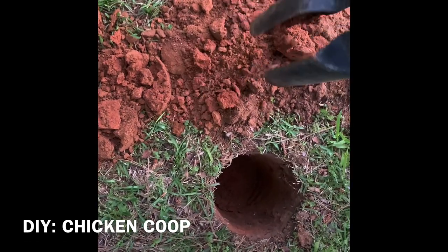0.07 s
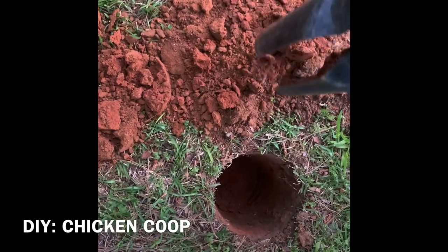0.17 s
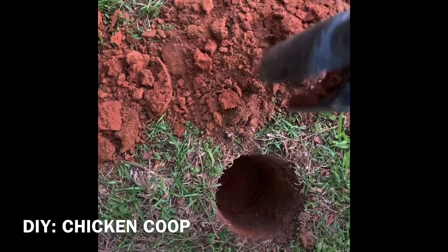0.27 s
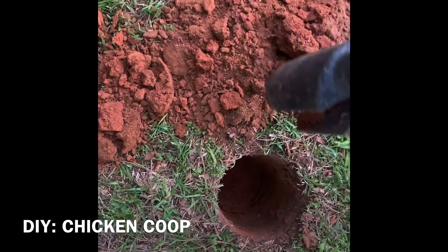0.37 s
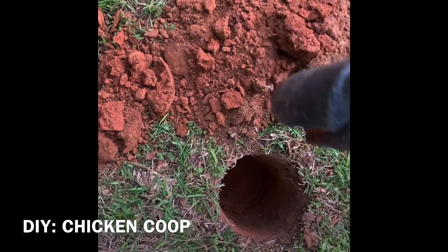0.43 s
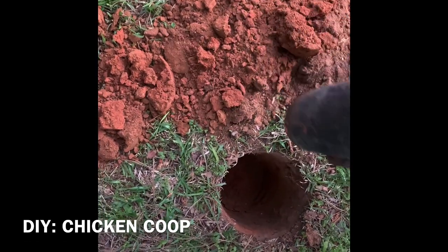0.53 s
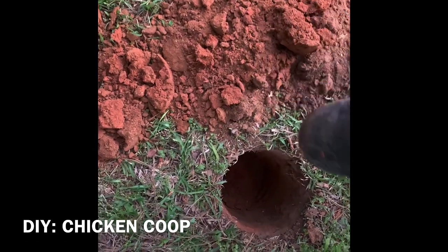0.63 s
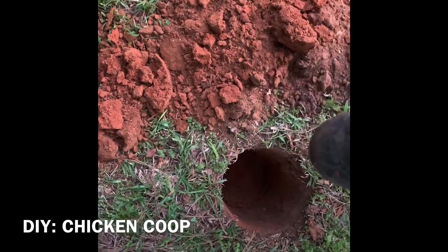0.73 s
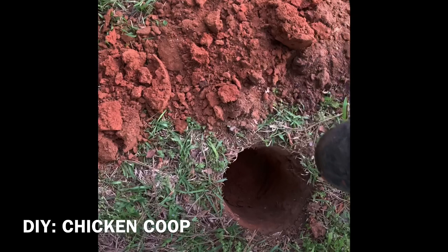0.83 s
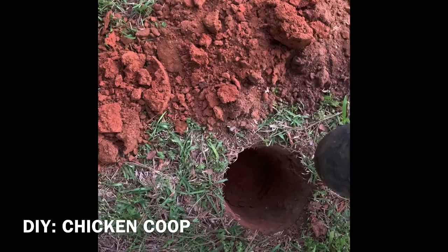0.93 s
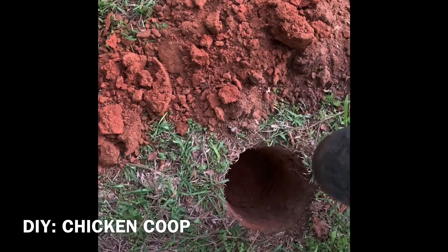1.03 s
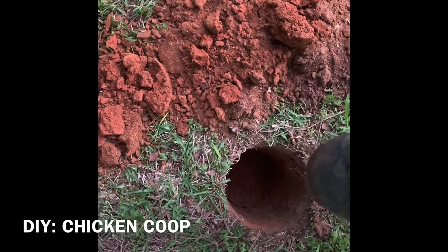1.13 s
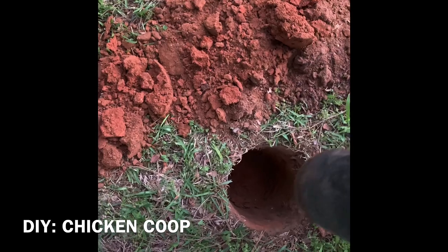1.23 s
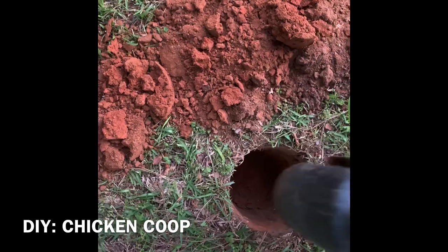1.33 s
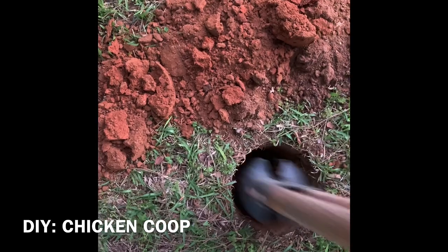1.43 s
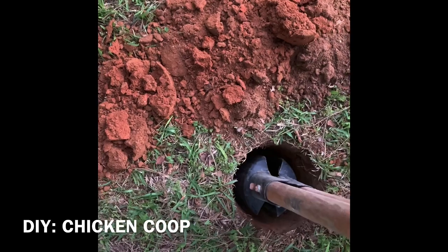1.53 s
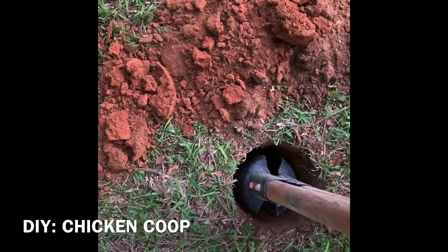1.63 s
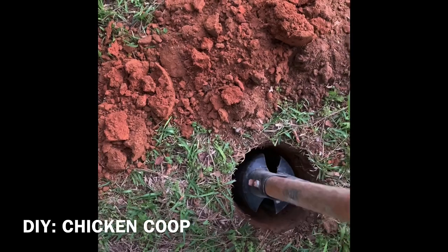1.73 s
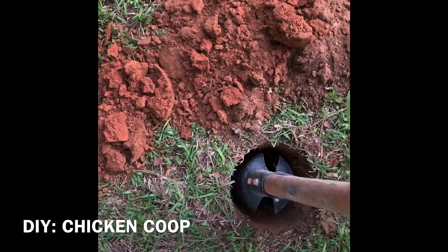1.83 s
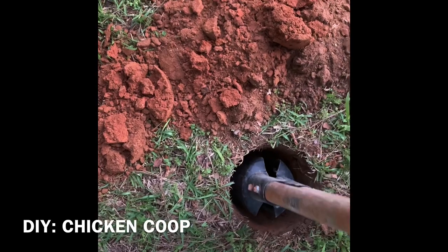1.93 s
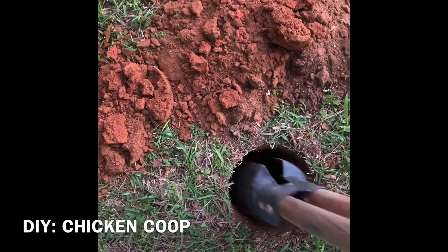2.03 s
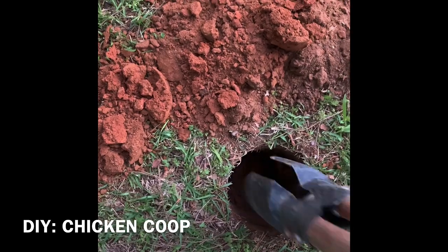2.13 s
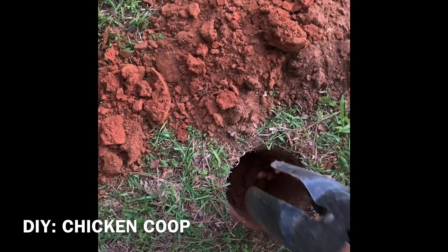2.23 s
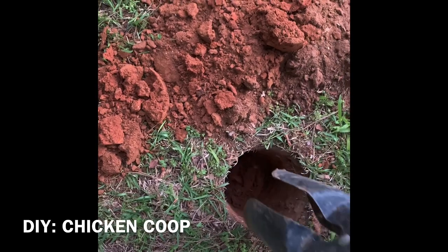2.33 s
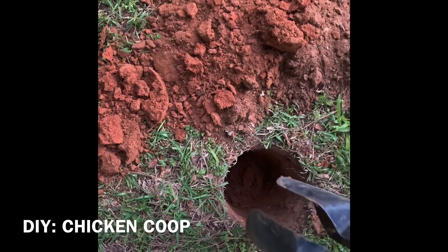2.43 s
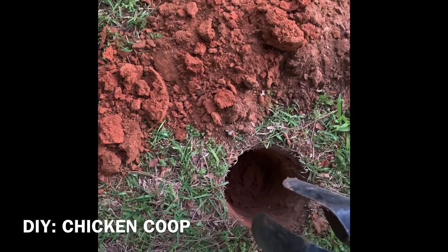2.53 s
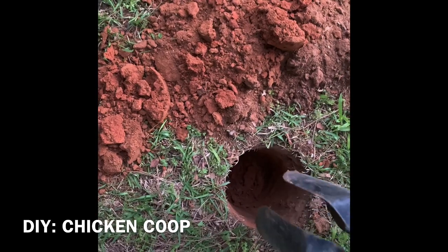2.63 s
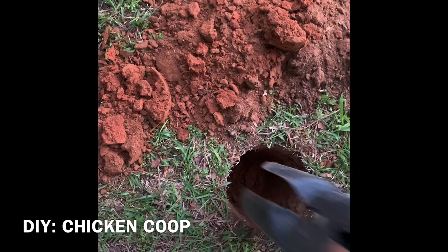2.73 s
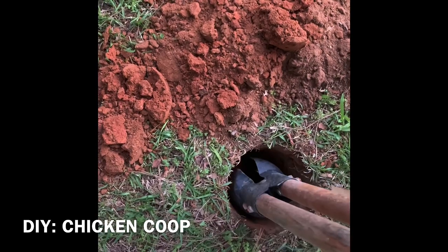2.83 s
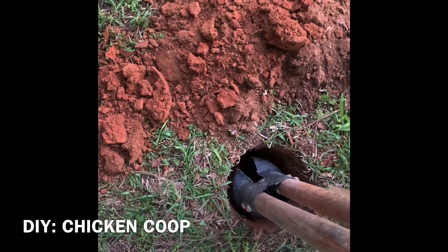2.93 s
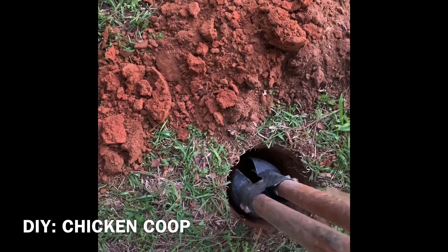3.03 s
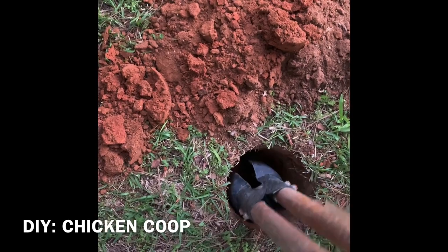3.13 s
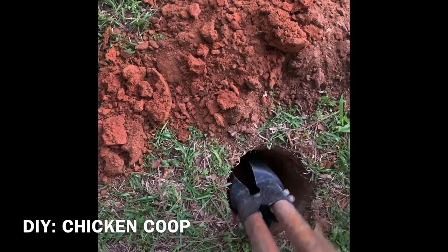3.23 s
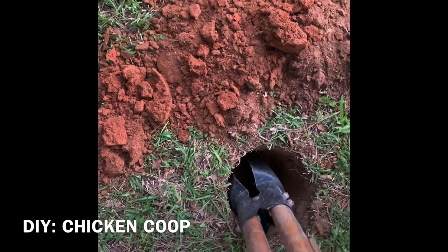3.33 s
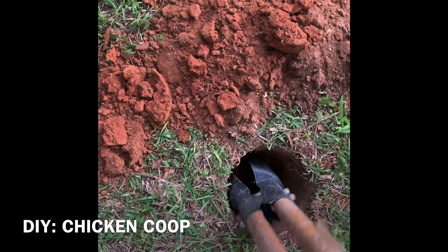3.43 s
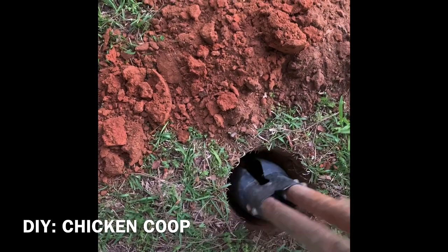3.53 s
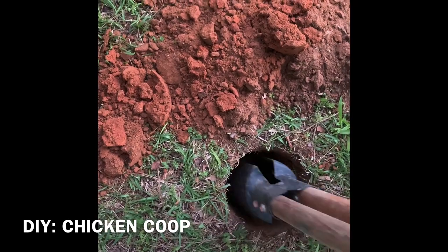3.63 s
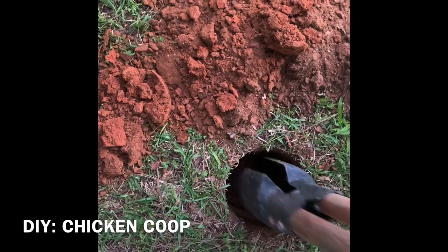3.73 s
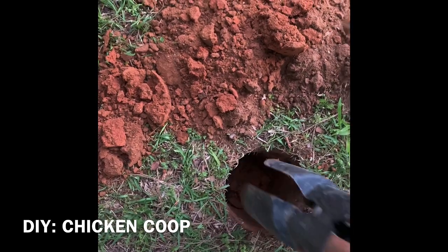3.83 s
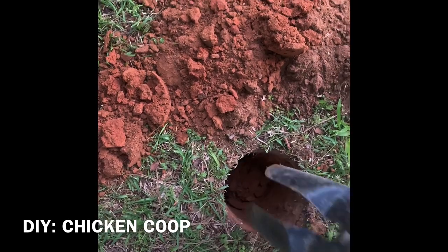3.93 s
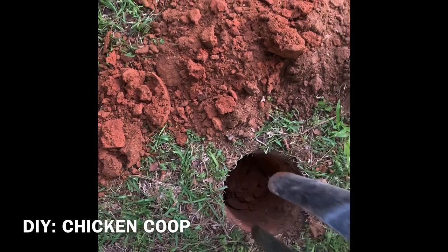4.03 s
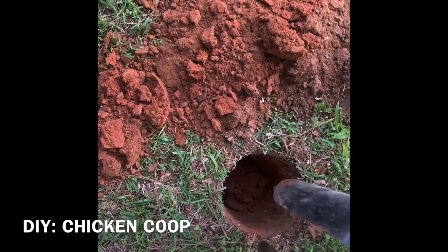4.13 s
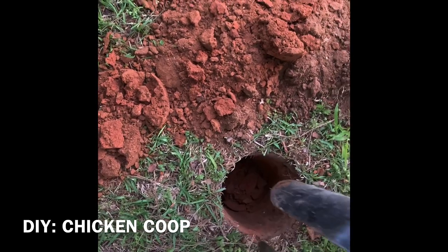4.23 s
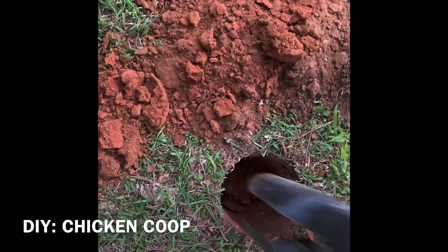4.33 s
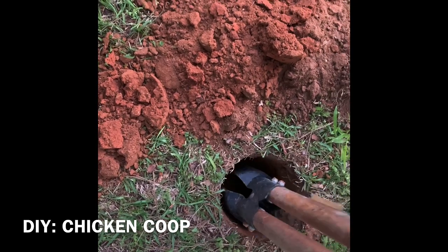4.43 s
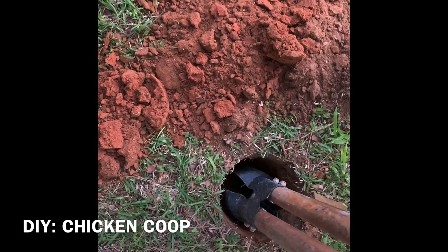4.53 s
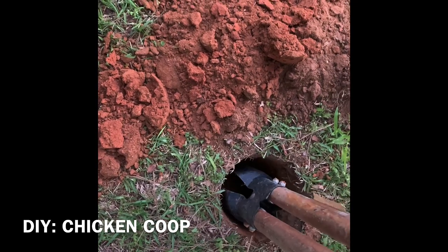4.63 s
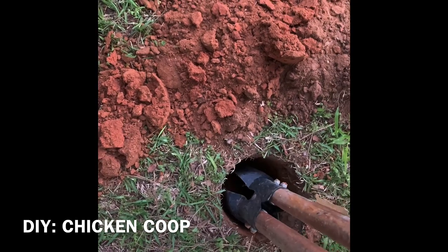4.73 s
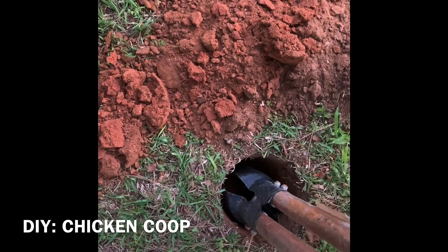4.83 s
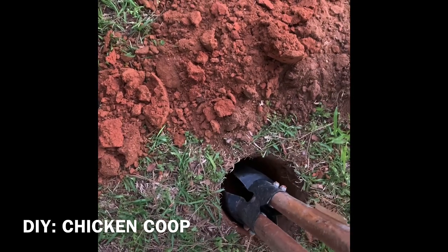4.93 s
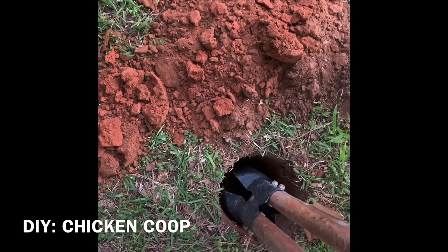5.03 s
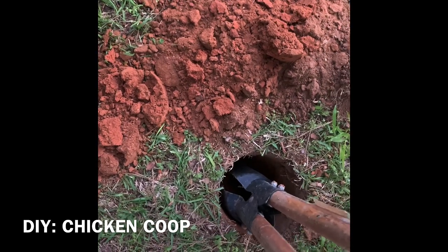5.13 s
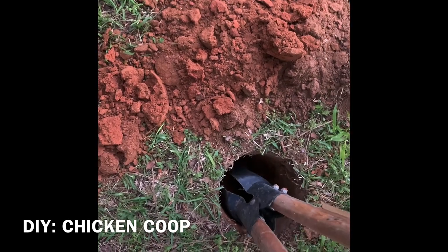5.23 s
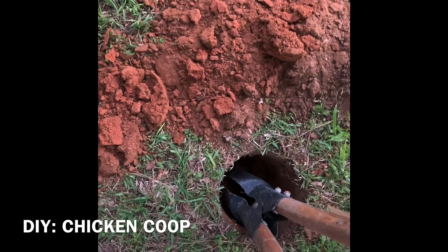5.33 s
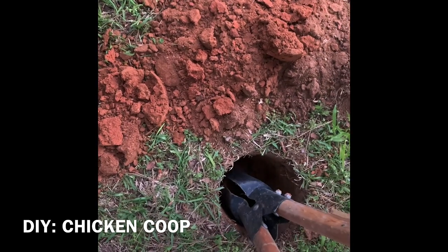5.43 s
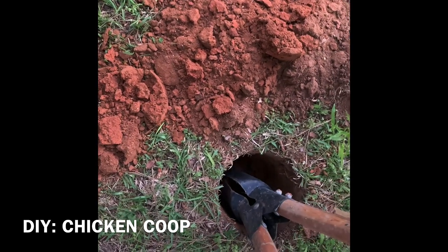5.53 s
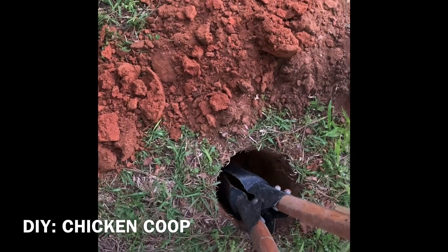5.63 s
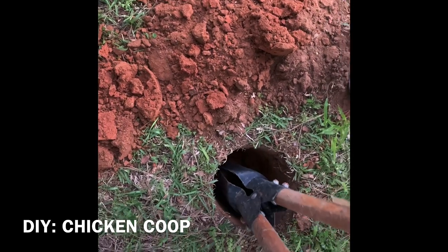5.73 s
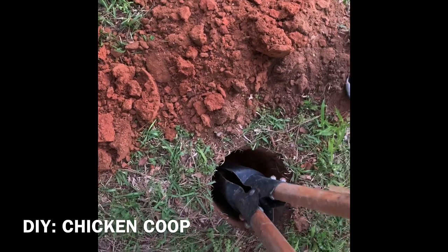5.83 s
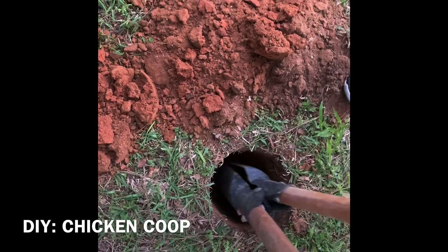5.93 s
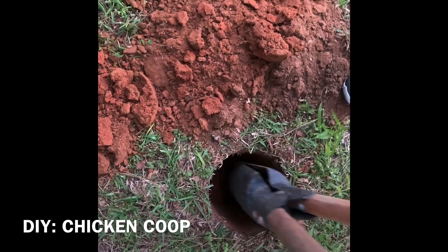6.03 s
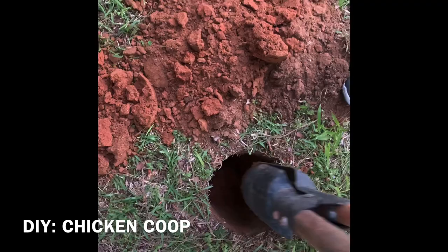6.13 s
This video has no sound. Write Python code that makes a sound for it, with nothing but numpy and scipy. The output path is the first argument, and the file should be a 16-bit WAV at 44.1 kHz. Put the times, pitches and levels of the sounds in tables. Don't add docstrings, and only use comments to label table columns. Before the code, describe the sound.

Light wind and distant low rumble lie under a hole being dug in hard clay. The scoop is tapped out, then driven down twice, each blow a tight knock of wood and buried steel with splitting grit and a falling bassy thump. Blades scrape loose with a small ringing clash; another big stab follows, then soft sliding crumbs and ticks. Close stereo phone pickup, dry open air.

```python
import sys
import numpy as np
from scipy import signal
from scipy.fft import rfft, irfft, next_fast_len
from scipy.io import wavfile
from scipy.ndimage import uniform_filter1d

SR = 44100
rng = np.random.default_rng(int(sys.argv[2]) if len(sys.argv) > 2 else 0)


def gain_from_decibels(decibels):
    exponent = np.asarray(decibels, float) / 20
    return 10 ** exponent


def to_wav(s):
    ch = np.atleast_2d(s).T
    pcm = np.round(np.clip(ch, -1, 1) * 32767)
    wavfile.write(sys.argv[1], SR, pcm.astype(np.int16))


N = 272965
T = np.arange(N) / SR
LONG = next_fast_len(N)
HZ = np.maximum(np.arange(LONG // 2 + 1) * SR / LONG, 1)

# f/Hz, density/dB per Hz
AIR_SPECTRUM = [(120, -7.5), (430, -11), (900, -11.5), (1500, -16), (2100, -23.5), (2800, -32.5),
                (4500, -38), (7500, -49), (11000, -44.5), (14000, -50.5)]
RUMBLE_SPECTRUM = [(12, -47.5), (20, -7.5), (33, -2), (54, 3), (135, -7.5), (166, -16.5), (220, -18),
                   (290, -46), (480, -120)]
DUST_SPECTRUM = [(8000, -12), (10000, 0.5), (12000, 2), (14000, 0.5), (16000, -3.5)]
CRUMB_SPECTRUM = [(3500, -2), (5000, 0.5), (6500, -0.5), (8000, -3), (9500, -5)]
CLAY_SPECTRUM = [(300, -7.5), (700, 5), (1200, -1.5), (1700, 3), (2400, -2), (3300, -4.5), (4300, -4.5)]
LUMP_SPECTRUM = [(200, -3), (400, -3.5), (700, -1.5), (1100, -6.5)]
GRIT_SPECTRUM = [(3000, -7), (4200, -9), (5500, 2.5), (6800, 2), (8800, 0.5), (10500, -2.5), (12700, -0.5),
                 (15500, -6)]
# f/Hz, correlation
PORT_LIKENESS = [(60, 0.96), (130, 1), (290, 0.7), (640, -0.18), (1400, -0.15), (3100, -0.5), (16000, 1)]
# t/s, level/dB
GUSTS = [(0.0, -53.5), (1.3, -56), (1.78, -52.5), (2.41, -53), (2.65, -56), (2.89, -50), (3.1, -53.5),
         (3.98, -55.5), (4.79, -50.5), (5.0, -51.5), (5.3, -56), (6.19, -53.5)]
# t/s, flow level/dB, coarse share level/dB
TRICKLE = [(0.0, -96, 16), (0.12, -81, 16), (0.65, -69.5, 8), (0.9, -76, 7.5), (1.17, -87, 2),
           (1.96, -68.5, 16.5), (2.29, -81.5, 7), (2.76, -84.5, 7.5), (2.98, -65.5, 8), (3.62, -61, 8.5),
           (3.78, -69, 13.5), (4.07, -84, 4), (4.34, -70.5, 8), (4.53, -64, 8), (4.93, -68.5, 12),
           (5.55, -70, 12.5), (5.9, -75, 9.5), (6.19, -70, 15)]
# t/s, level/dB, size (0 dust, 1 crumb, 2 clay, 3 lump)
GRAINS = [(0.841, -62, .1), (.8574, -54, 0.37), (0.8897, -48, 0.081), (.903, -47, 0.15), (.9194, -56, 0.28),
          (.9562, -55, 0.28), (0.981, -52, .05), (0.9953, -67, 0.91), (1.034, -59, 0.56),
          (1.0835, -54.5, 1.03), (1.8789, -52, 1.27), (3.1957, -54, 0.11), (3.4161, -52, 0.81),
          (3.492, -38, 0.72), (3.5769, -41, 1.26), (3.586, -34.5, .45), (4.4763, -48, 0.63),
          (5.116, -49, 0.43), (5.5949, -37.5, .21), (5.608, -53, 0.56), (5.6486, -40.5, 0.6),
          (5.656, -45.5, 0.86), (5.851, -56, 0.068), (5.983, -42.5, 0.97), (6.008, -52, 1.23),
          (6.062, -52, 0.63), (6.0851, -54, 0.87), (5.247, -50.5, 1.6), (4.967, -54.5, .9),
          (4.703, -53, .9), (5.143, -55, 0.92)]
# t/s, level/dB, size (as above), ring f/Hz
CLODS = [(.5564, -56, 2.3, 1573), (.7024, -54, 1.1, 1890), (1.6961, -47.5, 2.83, 343),
         (1.9614, -44, 1.22, 1740), (2.0914, -39, 1.84, 770), (2.1594, -47, 2.26, 2046),
         (2.3327, -50.5, 2.95, 794), (2.7157, -52.5, 1.98, 784), (2.9533, -43.5, 0.99, 3350),
         (3.198, -49, 3, 580), (3.3394, -35, 0.91, 1920), (4.347, -42, 1.65, 813),
         (4.4766, -36.5, 4.04, 700), (4.729, -50.5, 1.9, 1550), (4.637, -51.5, 2.6, 580),
         (4.777, -44, 1.38, 940), (4.9494, -51, 1.58, 1550)]
# f/Hz, level/dB, t60/s
SCOOP_MODES = [(1550, -33.5, 0.06), (2154, -37, 0.085), (3680, -48, 0.084)]
# lag/s, level/dB, f/Hz, t60/s
TAP_MODES = [(-.014, -33, 1300, .05), (-.007, -27, 1300, 0.12), (.0003, 5.5, 1384, 0.0061),
             (.0004, -10.5, 1900, 0.018), (-0.017, -25.5, 167, 0.026), (.012, -25.5, 813, 0.041),
             (.0031, -7, 1030, 0.011), (-0.0028, -7, 366, 0.018), (0.00016, -14, 1318, .04),
             (.0075, -14.5, 1680, 0.031), (-0.002, -36.5, 2900, 0.025), (.006, -36.5, 510, .049)]
# f/Hz, level/dB, t60/s
CLASH_MODES = [(2400, -30, .075), (2020, -32, .07), (4030, -31, .13), (5980, -33, .15), (780, -35, .05)]
# t/s, level/dB, f/Hz, t60/s
KNOCKS = [(1.453, -20, 934, 0.048), (1.455, -3, 269, 0.023), (1.46, -3.5, 3020, .012),
          (1.464, -14, 2408, 0.013), (1.4641, -6, 972, 0.049), (1.4645, -6.5, 648.5, 0.059),
          (1.467, -6, 304, 0.036), (1.464, -17.5, 1670, 0.044), (1.4707, -9.5, 803, 0.028),
          (1.4788, -19, 149.3, 0.025), (2.8, -19, 1375, 0.06), (2.801, -19, 3780, 0.048),
          (2.806, -21.5, 810, 0.052), (2.812, -7.5, 369, 0.041), (2.815, -8.5, 328, 0.032),
          (2.8217, -5, 302, 0.046), (2.831, 0, 148.7, .022), (3.70, -28.5, 284, 0.064),
          (4.411, -10, 834, 0.047), (4.4204, 0.5, 695, 0.016), (4.4231, 4, 287, 0.023),
          (4.424, -12, 1453, 0.036), (4.4297, 0, 199.9, 0.07), (4.4319, 0.5, 196.8, 0.06),
          (4.436, -20, 138, .03)]
# t/s, left minus right level/dB
STAB_LEANS = [
    (1.46, -5.5),
    (2.81, -9.5),
    (3.7, -2),
    (4.42, 8.5),
]
# t/s, level/dB, first f/Hz, last f/Hz, t60/s
THUMPS = [
    (1.48, -12, 132.5, 72.4, 0.058),
    (2.8297, -9, 125, 61.6, .1),
    (4.4334, -6, 124, 58.7, 0.098),
    (4.924, -27.5, 71.4, 59, 0.1),
    (5.049, -30.5, 59, 48, 0.38),
    (2.156, -39.5, 101.5, 91, 0.4),
]
# t/s, hold/s, treble level/dB, middle level/dB
BITES = [
    (1.441, 0.0028, -56, -38),
    (2.801, 0.011, -20.5, -23),
    (3.68, 0.0076, -42, -43),
    (4.405, 0.014, -25.5, -28.5),
]
# t/s, hold/s, treble level/dB, middle level/dB
CRACKS = [
    (1.45, 0.013, -24.5, -25),
    (1.4628, .004, -18.5, -14),
    (2.807, 0.015, -32, -27),
    (3.69, 0.0108, -26, -42.5),
    (3.703, 0.0043, -27.5, -47),
    (4.418, 0.0073, -32, -28.5),
    (2.828, .0012, -34.5, -31),
]
# t/s, hold/s, treble level/dB, middle level/dB
SETTLES = [
    (.672, 0.0028, -57.5, -40),
    (1.466, 0.0027, -42.5, -30),
    (2.828, 0.002, -43, -30.5),
    (3.709, 0.011, -44.5, -40),
    (4.43, 0.0053, -43.5, -32.5),
]
# t/s, hold/s, treble level/dB, middle level/dB
RUBS = [(0.872, 0.17, -64.5, -87), (1.506, 0.11, -64.5, -62), (1.794, 0.027, -77, -53),
        (1.98, 0.026, -45, -46), (2.968, 0.19, -66, -65), (3.209, 0.046, -52, -50.5),
        (3.598, 0.055, -53.5, -61), (4.557, 0.15, -56.5, -67), (5.133, 0.13, -60.5, -57),
        (5.63, 0.12, -64, -63), (5.958, .05, -58.5, -56)]
# f/Hz, level/dB, t60/s
BLADE_MODES = [(1540, -8, .07), (2020, -3, .08), (2400, -7, .05), (2680, -8, .08), (4030, -5, .11),
               (4850, -10, .09), (5830, -8, .05), (5980, -12, .13), (6550, -6, .05)]
# f/Hz, level/dB, t60/s
HINGE_MODES = [(12700, -55, .22), (12560, -58, .18)]


def along(table):
    hz, value = np.transpose(table)
    return np.interp(np.log(HZ), np.log(hz), value)


def noise(spectrum):
    skirt = np.minimum(HZ / spectrum[0][0], 1) ** 3 * np.minimum(spectrum[-1][0] / HZ, 1) ** 4
    mid, side = rfft(rng.standard_normal((2, LONG)))
    like = np.clip(along(PORT_LIKENESS), -1, 1)
    mid, side = mid * np.sqrt(1 + like), side * np.sqrt(1 - like)
    ports = np.array([mid + side, mid - side])
    x = irfft(ports * gain_from_decibels(along(spectrum)) * skirt, LONG)[:, :N]
    return x / x.std()


def walk(rate):
    hold = int(SR / rate)
    steps = np.repeat(rng.standard_normal(N // hold + 1), hold)
    return uniform_filter1d(uniform_filter1d(steps, hold), hold)[:N]


def patchy(x, depth_db, frames=5, bins=14):
    z = signal.stft(x, nperseg=256)[2]
    field = rng.standard_normal(z.shape[1:])
    field = uniform_filter1d(uniform_filter1d(field, frames, axis=1), bins, axis=0)
    gain = gain_from_decibels(depth_db * np.clip(field / field.std(), -3, 1.7))
    return signal.istft(z * gain, nperseg=256)[1][:, :N]


def add(out, s, sound):
    i = int(s * SR)
    out[..., i:i + sound.shape[-1]] += sound[..., :N - i]


def swell(rise_s, t60_s, hold_s=0):
    t = np.arange(int((6 * rise_s + hold_s + 1.3 * t60_s) * SR)) / SR - 6 * rise_s
    rise = np.exp(np.minimum(t, 0) / rise_s)
    return np.where(t < 0, rise, gain_from_decibels(-60 * np.maximum(t - hold_s, 0) / t60_s))


def ring(hz, t60_s, pan_db, phase_rad, rise_cycles):
    t = np.arange(int(t60_s * SR)) / SR
    sides = np.array([[1], [-1]])
    push = np.sin(np.pi / 2 * np.minimum(t * hz / rise_cycles, 1)) ** 2
    decay = gain_from_decibels(-60 * t / t60_s + sides * pan_db / 2)
    return push * decay * np.sin(2 * np.pi * hz * t + sides * phase_rad)


def mode(push, hz, db, t60_s):
    pole = np.exp(2j * np.pi * hz / SR - np.log(1000) / (t60_s * SR))
    return gain_from_decibels(db) * signal.lfilter([1], [1, -pole], push).imag


def outdoors():
    hush_db = -57 + 0.7 * walk(rate=3)
    hush = gain_from_decibels(hush_db) * patchy(noise(AIR_SPECTRUM), 2, frames=30, bins=2)
    rumble_db = np.interp(T, *np.transpose(GUSTS)) + 4 + 1.9 * walk(rate=10)
    return hush + gain_from_decibels(rumble_db) * noise(RUMBLE_SPECTRUM)


def sliding():
    s, flow, coarse = np.transpose(TRICKLE)
    flow_db, coarse_db = np.interp(T, s, flow), np.interp(T, s, coarse)
    grain_db = 2 * walk(rate=300)
    sizes = [(CRUMB_SPECTRUM, 0, 0.05), (DUST_SPECTRUM, 0.5, -1.2),
             (CLAY_SPECTRUM, -2, 0.84), (LUMP_SPECTRUM, -6.5, 1.1)]
    out = 0
    for spectrum, trim_db, share in sizes:
        level_db = flow_db + share * coarse_db + trim_db + grain_db + 0.87 * walk(rate=12)
        out = out + gain_from_decibels(level_db) * noise(spectrum)
    return patchy(patchy(out, 3.5), 4, frames=24, bins=2)


def size_db(size, kind):
    return -9 * abs(size - kind) ** 2.4


def ticks():
    puffs, rings = np.zeros((4, N)), np.zeros((2, N))
    trims_db, t60s_s = (3, 2.06, 3.1, 1.5), (0.0078, 0.018, 0.05, 0.07)
    for s, db, size, *_ in GRAINS + CLODS:
        for kind, (puff, trim_db, t60_s) in enumerate(zip(puffs, trims_db, t60s_s)):
            level = gain_from_decibels(db + size_db(size, kind) + trim_db)
            add(puff, s - t60_s / 25, level * swell(t60_s / 50, t60_s))
    phases_rad = rng.uniform(-0.75, 1, len(CLODS))
    for (s, db, size, hz), phase_rad in zip(CLODS, phases_rad):
        level = gain_from_decibels(db + size_db(size, kind=2.6) + 12)
        add(rings, s, level * ring(hz, 0.052, -2.8, phase_rad, rise_cycles=0.59))
    spectra = (DUST_SPECTRUM, CRUMB_SPECTRUM, CLAY_SPECTRUM, LUMP_SPECTRUM)
    grains = sum(puff * noise(spectrum) for puff, spectrum in zip(puffs, spectra))
    grains = patchy(grains, 4, frames=6, bins=4)
    return rings + grains + sum(mode(grains, *part) for part in SCOOP_MODES)


def tap():
    out = np.zeros((2, N))
    for lag_s, db, hz, t60_s in TAP_MODES:
        add(out, 0.67 + lag_s, gain_from_decibels(db) * ring(hz, t60_s, -5, -0.52, rise_cycles=1.9))
    return out


def clash():
    out = np.zeros((2, N))
    for hz, db, t60_s in CLASH_MODES:
        add(out, 3.703, gain_from_decibels(db) * ring(hz, t60_s, -1.5, 0.25, rise_cycles=20))
    return out


def thumps():
    out = np.zeros((2, N))
    for s, db, first_hz, last_hz, t60_s in THUMPS:
        t = np.arange(int(t60_s * SR)) / SR
        hz = last_hz + (first_hz - last_hz) * np.exp(-t / 0.0091)
        add(out, s, gain_from_decibels(db - 60 * t / t60_s) * np.sin(2 * np.pi * np.cumsum(hz) / SR))
    return out


def knocks():
    out = np.zeros((2, N))
    for s, db, hz, t60_s in KNOCKS:
        nearest = min(STAB_LEANS, key=lambda stab: abs(stab[0] - s))
        lean_db = nearest[1] * min(hz / 700, 1) ** 1.1
        phase_rad = -min((hz / 600) ** 1.4, 1.6)
        add(out, s, gain_from_decibels(db) * ring(hz, t60_s, lean_db, phase_rad, rise_cycles=1.1))
    return out


def blades(push):
    free = (T > 3.5) & (T < 3.9)
    steel = sum(mode(free * push, hz, db - 32, t60_s) for hz, db, t60_s in BLADE_MODES)
    return steel + sum(mode(~free * push, *bolt) for bolt in HINGE_MODES)


def crunches():
    treble, middle = np.zeros((2, N))
    shapes = [(BITES, (0.0038, 0.019)), (CRACKS, (0.0011, 0.019)), (SETTLES, (0.0054, 0.11))]  # rise/s, t60/s
    rows = [row + shape for table, shape in shapes for row in table]
    rows += [row + (0.012, 0.051 + 1.54 * row[1]) for row in RUBS]
    for s, hold_s, treble_db, middle_db, rise_s, t60_s in rows:
        shape = swell(rise_s, t60_s, hold_s)
        add(treble, s - 6 * rise_s, gain_from_decibels(treble_db) * shape)
        add(middle, s - 6 * rise_s, gain_from_decibels(middle_db) * shape)
    gritty_db = 0.92 * walk(rate=1100) + 2 * walk(rate=150)
    broken = treble * noise(GRIT_SPECTRUM) + middle * noise(CLAY_SPECTRUM)
    grains = gain_from_decibels(gritty_db) * patchy(broken, 3, frames=4, bins=3)
    return grains + blades(grains)


def scene():
    return outdoors() + sliding() + ticks() + tap() + clash() + thumps() + knocks() + crunches()


def thin_treble(pair):
    mid_side = np.array([pair[0] + pair[1], pair[0] - pair[1]]) / 2
    hz, _, z = signal.stft(mid_side, SR, nperseg=1024)
    power = uniform_filter1d(uniform_filter1d(abs(z) ** 2, size=7, axis=1), size=4, axis=2)
    treble = hz > 2300
    now = (abs(z[:, treble]) ** 2).mean(axis=(0, 1))
    calm = (now < gain_from_decibels(2 * -52)) & (now < np.roll(now, shift=2) * gain_from_decibels(2 * 5))
    around = uniform_filter1d(power, size=31, axis=1)
    masked = power < power[::-1] * gain_from_decibels(2 * -6.5)
    dip = power < around * gain_from_decibels(2 * -5.5)
    weak = (masked | dip) & treble[:, None] & calm
    mid, side = signal.istft(z * np.where(weak, gain_from_decibels(-40), 1), SR, nperseg=1024)[1][:, :N]
    return np.array([mid + side, mid - side])


def low_pass(x):
    return signal.sosfilt(signal.butter(12, 16810, fs=SR, output="sos"), x)


def record(dry):
    left, right = rfft(dry, LONG)
    share = 1 / (1 + (4000 / HZ) ** 12)
    late = left * np.exp(1j * (0.72 - 2 * np.pi * HZ * 0.000238))
    right = np.sqrt(1 - share) * right - np.sqrt(share) * late
    band = 1 / (1 + (HZ / 15900) ** 50) / (1 + (42 / HZ) ** 4)
    pair = thin_treble(irfft(np.array([left, right]) * band, LONG)[:, :N])
    return low_pass(np.tanh(0.81 * pair) / 0.85)


dry = scene()
out = record(dry)
to_wav(out)
```